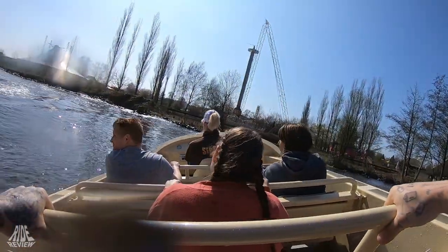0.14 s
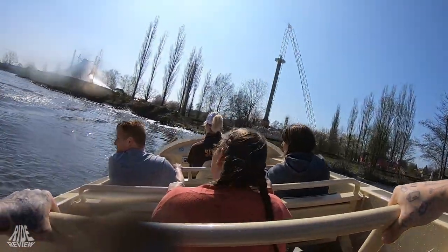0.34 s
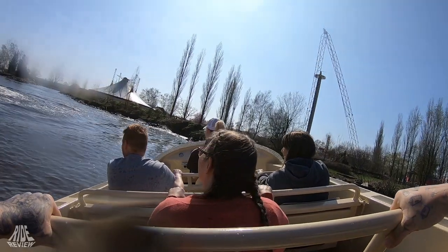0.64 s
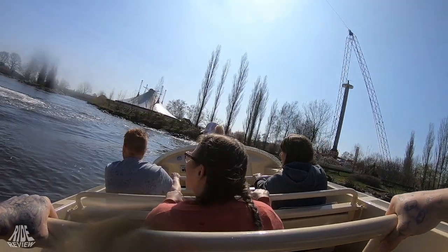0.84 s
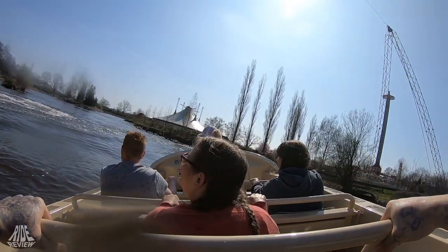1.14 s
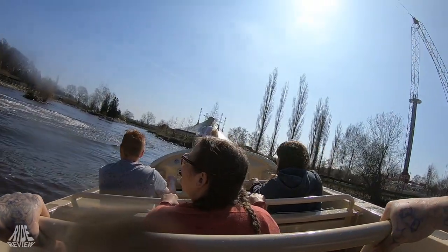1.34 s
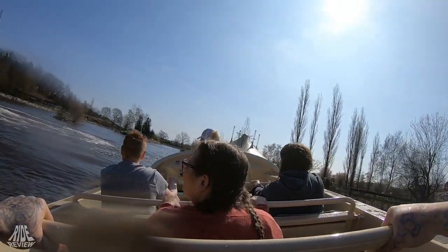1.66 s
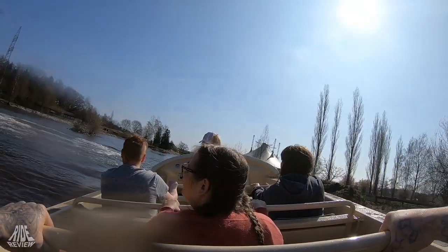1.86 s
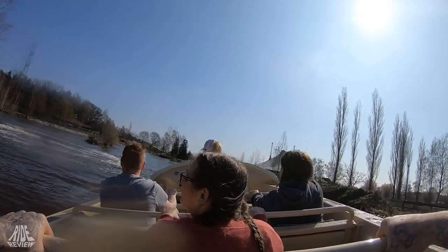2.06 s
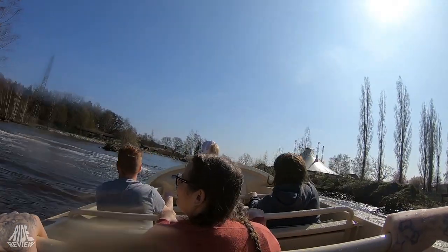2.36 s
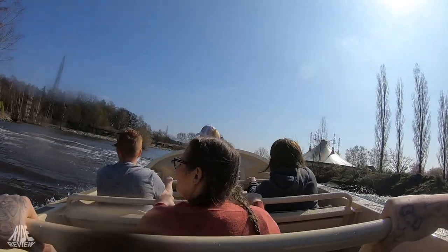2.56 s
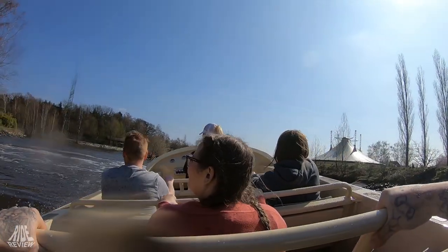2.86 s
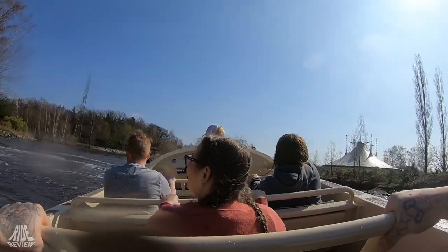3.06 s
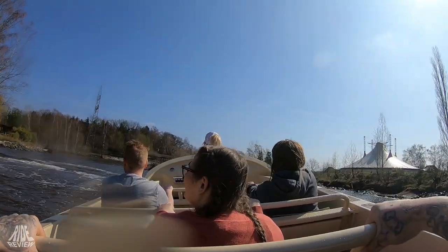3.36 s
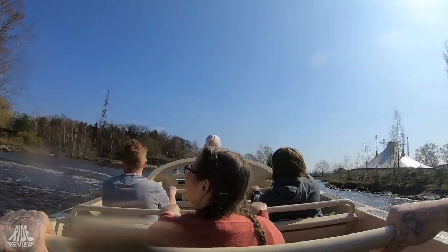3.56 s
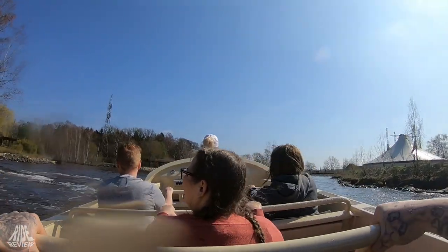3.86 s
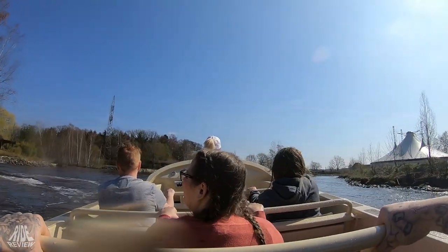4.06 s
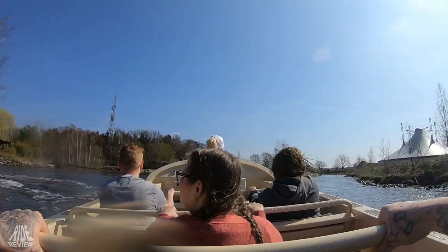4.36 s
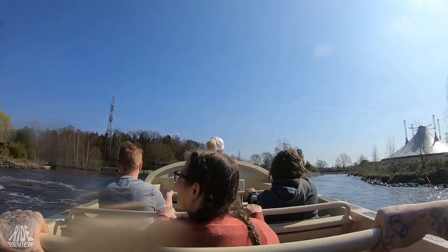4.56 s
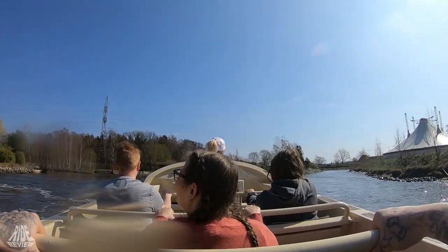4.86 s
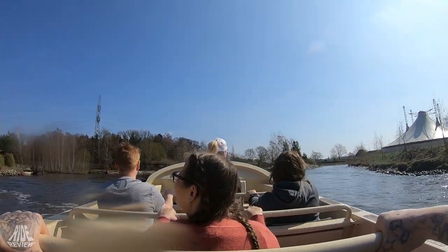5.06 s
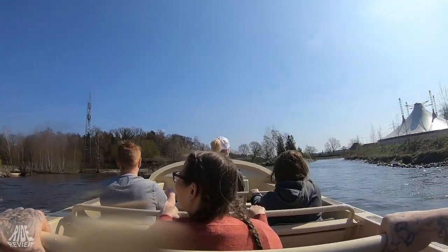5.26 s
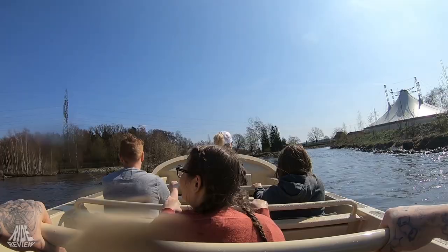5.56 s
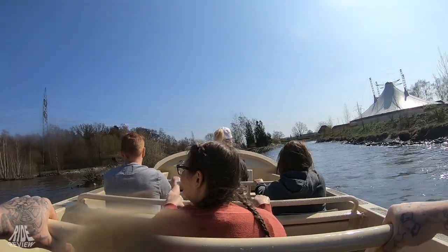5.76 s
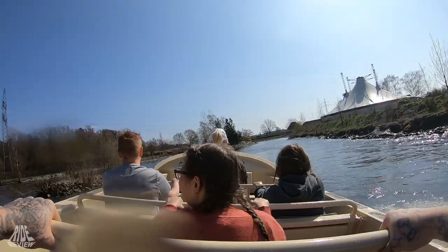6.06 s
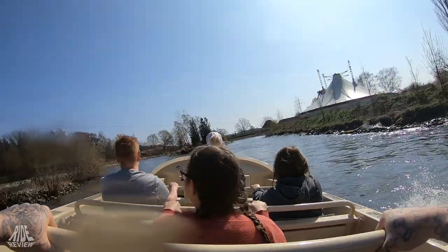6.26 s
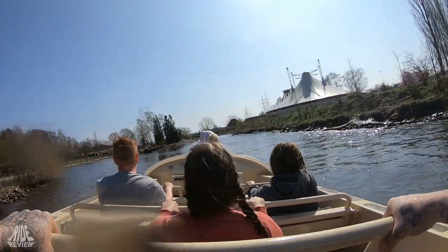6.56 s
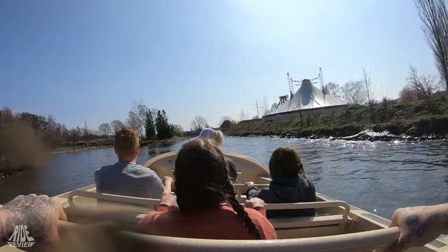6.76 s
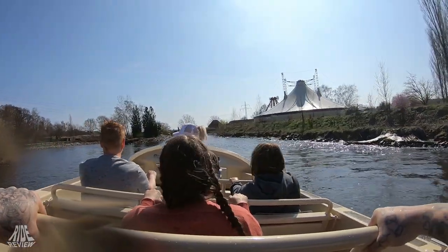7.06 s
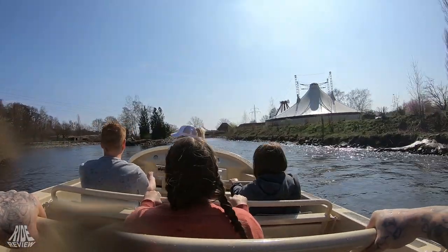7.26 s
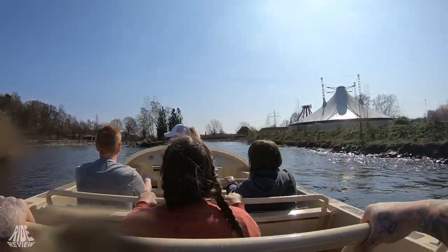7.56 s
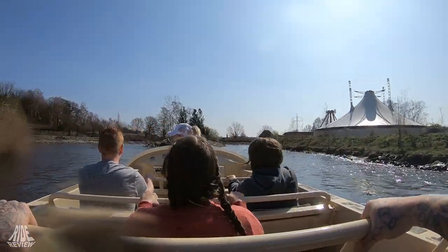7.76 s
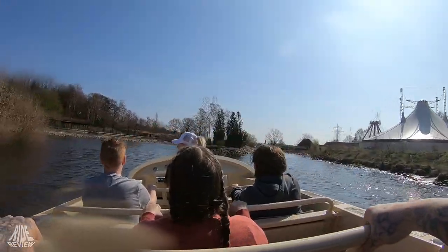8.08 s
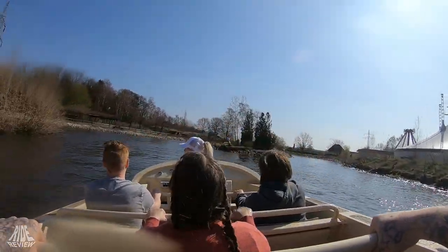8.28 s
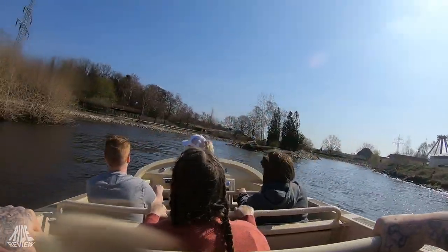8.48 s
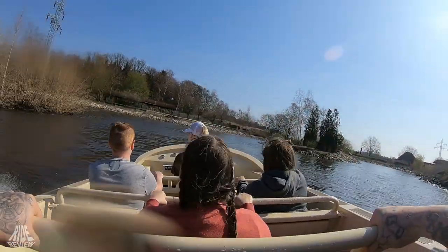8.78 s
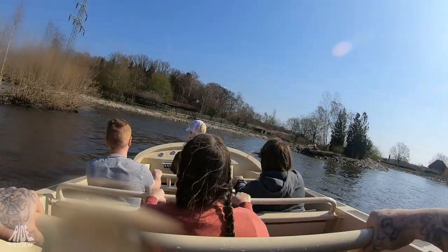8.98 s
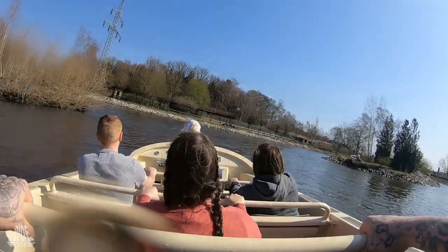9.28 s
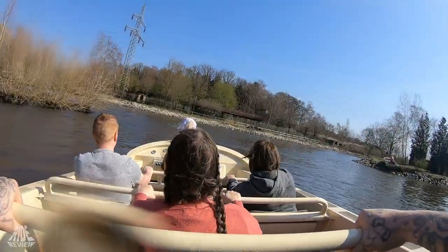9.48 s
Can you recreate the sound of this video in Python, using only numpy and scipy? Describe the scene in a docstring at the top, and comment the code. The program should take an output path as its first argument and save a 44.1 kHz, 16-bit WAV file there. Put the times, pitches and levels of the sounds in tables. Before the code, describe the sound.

On board a fast jet boat on an open river, a big engine drones loud and low at nearly constant pitch, its tones swelling and sinking. Wind rumbles on the exposed microphone, water rushes and spray hisses, and chop occasionally thumps the hull. After about eight seconds the throttle eases, pitch and loudness sag slightly, and tearing wind and rapid wave slaps take over.

```python
"""On a river, in the passenger seat of a V8 jet boat: it runs flat out, then eases off in a turn.
The exhaust drones as a sum of tones at multiples of the engine cycle, which swell and sink on their own,
and filtered noise burbles beside it. Shaped noise makes the rush of water, the hiss of spray and the wind,
which tears at the microphone near the end. Short bursts of noise make the slaps of chop and the ticks of drops."""
import sys
import numpy as np
from scipy import signal
from scipy.fft import rfft, irfft
from scipy.io import wavfile
from scipy.ndimage import uniform_filter1d, minimum_filter1d

SR = 44100
rng = np.random.default_rng(int(sys.argv[2]) if len(sys.argv) > 2 else 0)


def unload_audio(sound):
    """Save the sound as a 16-bit wav file, at the path given as the first command line argument."""
    columns = np.transpose(np.atleast_2d(sound))
    # keep every value between -1 and 1, then stretch to whole-number steps
    steps = np.round(np.clip(columns, -1, 1) * 32767)
    wavfile.write(sys.argv[1], SR, steps.astype(np.int16))


N = 424683  # length in samples


def undb(db):
    """Turn decibels into a gain."""
    return 10 ** (np.asarray(db) / 20)


def unit(x):
    """Scale a signal to an rms of 1."""
    return x / np.sqrt(np.mean(x ** 2))


def curves(table):
    """Join the points of each table column by straight lines in time."""
    times, *columns = np.transpose(table)
    return [np.interp(np.arange(N) / SR, times, column) for column in columns]


def walk(rate):
    """Smooth random wandering of rms 1 that changes about rate times a second."""
    points_per_s = SR // 20
    count = 16 * points_per_s
    f = np.fft.rfftfreq(count, 1 / points_per_s)
    slow = irfft(rfft(rng.standard_normal(count)) / (1 + (f / rate) ** 4))
    return np.interp(np.arange(N) / SR, np.arange(count) / points_per_s, unit(slow))


def noise(colour):
    """Noise of rms 1 whose spectrum follows a table of (frequency [Hz], level [dB])."""
    hz, db = np.transpose(colour)
    f = np.fft.rfftfreq(N, 1 / SR) + 1  # 1 Hz up, to avoid log of zero
    shape = undb(np.interp(np.log(f), np.log(hz), db))
    return unit(irfft(rfft(rng.standard_normal(N)) * shape, N))


def resonate(x, hz, width_hz):
    """A steep resonance: one band-pass applied twice."""
    b, a = signal.iirpeak(hz, hz / width_hz, fs=SR)
    return signal.lfilter(b, a, signal.lfilter(b, a, x))


def ramp(start_s, length_s):
    """A straight rise from 0 to 1."""
    return np.clip((np.arange(N) / SR - start_s) / length_s, 0, 1)


def swell(peak_s, rise_s, fall_s):
    """An exponential rise to 1, then an exponential fall."""
    t = np.arange(N) / SR
    return np.exp(np.minimum((t - peak_s) / rise_s, (peak_s - t) / fall_s))


def scattered_lag(wander):
    """Short waves take many paths around the hull, which shift as it moves (phase in radians)."""
    return rng.uniform(0, 2 * np.pi) + wander * walk(rate=1.2)


# Engine speed, before a slight unevenness: (time [s], four-stroke cycle rate [Hz])
ENGINE_SPEED = [(0, 30.0), (.5, 29.95), (.9, 30.06), (2.9, 29.94), (3.6, 30.03), (5.1, 30.06), (5.55, 30.2),
                (5.95, 30.14), (6.3, 30.31), (7.1, 30.2), (7.7, 30.11), (8.14, 29.9), (8.66, 29.15),
                (9.2, 28.85), (9.63, 28.75)]


def crank():
    """The crank turns a little unevenly: gives the cycle rate [Hz] and the cycles turned so far."""
    cycle_hz, = curves(ENGINE_SPEED)
    uneven_hz = cycle_hz * (1 + 0.0013 * walk(rate=14.6))
    return cycle_hz, rng.uniform() + np.cumsum(uneven_hz) / SR


# The outlets dip into the wash: (start [s], end [s], level change [dB])
OUTLET_DIPS = [(2.261, 2.45, -0.5), (6.168, 6.968, -2.5)]
DIP_RAMP_S = 0.085
# The throttle eases: the tones drop at once, then fall with each Hz of cycle rate lost
EASE_S, EASE_DROP_S = 8.158, 0.02
EASE_DROP_DB, EASE_DB_PER_HZ = -3.5, -2


def muffling(cycle_hz):
    """Exhaust level change in dB: it falls as the throttle eases and whenever the outlets dip under."""
    easing = ramp(EASE_S, EASE_DROP_S)
    lost_hz = cycle_hz[np.argmax(easing)] - cycle_hz
    dips = 0
    for start, end, db in OUTLET_DIPS:
        under = ramp(start - DIP_RAMP_S / 2, DIP_RAMP_S) - ramp(end - DIP_RAMP_S / 2, DIP_RAMP_S)
        dips = dips + db * under
    return easing * (EASE_DROP_DB + EASE_DB_PER_HZ * lost_hz) + dips


# All exhaust tones; the level counts only for the weak ones, relative to each other:
# (order: multiple of the cycle rate, relative level [dB])
EXHAUST_ORDERS = [(1, -34.1), (2, -2.0), (3, -12.3), (4, -8.4), (5, -12.8), (6, -1.3), (7, -13.3), (8, 0.0),
                  (9, -2.4), (10, -14.3), (11, -18.6), (12, -19.5), (13, -21.3), (14, -14.3), (15, -13.7),
                  (16, -12.6), (17, -19.6), (18, -28.5), (19, -41.6), (20, -30.5), (21, -23), (22, -29.8),
                  (23, -22.5), (24, -26.1)]
# Hull and pipe resonances that delay the orders near them: (frequency [Hz], width [Hz])
DELAY_RESONANCES = [(210, 20), (238, 40)]
LAG_DRIFT = 0.25  # the delays drift as the hull moves [radians]
# Lean of the hull, out of one turn, through an opposite one and into a third: (time [s], heel [degrees])
HULL_HEEL = [(0, 19.5), (1.6, 15), (3.9, 13), (5.7, -7), (6.6, -17), (7.5, 1.5), (8.6, 8), (9.63, 13)]
# Orders whose level follows the heel of the hull:
# (order, level on an even keel [dB], change [dB per degree of heel])
HEEL_ORDERS = [(4, -31.5, 0.4262), (5, -29.5, -0.34), (16, -37, 0.4383)]
# Strong orders at full throttle, each (time [s], level [dB]):
# the crankshaft boom (2), the firing tone (8), and the tones that swell and sink beside it (6, 9, 10)
ORDER_2 = [(0, -20), (1.2, -21), (2.1, -19), (2.4, -19.5), (3.4, -17.5), (3.7, -19), (5.2, -20.5),
           (5.6, -18), (6.399, -21), (7.6, -20), (8.051, -20.5), (8.3, -15), (8.6, -22), (9, -25),
           (9.63, -25)]
ORDER_6 = [(0, -19.5), (.45, -15), (.75, -24.5), (1.05, -14), (1.2, -22), (1.4, -15.5), (1.95, -18.5),
           (2.2, -25.5), (2.45, -19), (3.1, -16), (3.45, -21), (3.7, -15), (4.15, -17.5), (4.749, -21),
           (5.05, -21), (5.599, -24.5), (6.95, -27), (7.5, -19), (8.1, -25.5), (9.63, -18)]
ORDER_8 = [(0, -22), (.5, -28.5), (1, -21), (1.15, -15.5), (1.6, -15), (1.95, -19.5), (2.15, -17),
           (2.5, -26.5), (2.9, -17.5), (3.3, -17.5), (3.43, -23.5), (3.65, -15.5), (4, -19.5), (4.2, -17),
           (4.45, -18.5), (4.7, -14.5), (5.35, -14.5), (5.75, -17), (6.1, -17.5), (6.87, -17), (7.05, -15),
           (7.4, -15.5), (7.75, -14.5), (8.13, -20), (8.22, -23), (8.38, -16.5), (8.73, -17), (8.87, -14),
           (9.1, -20.5), (9.63, -22.5)]
ORDER_9 = [(0, -17), (.7, -18), (1, -20), (2.7, -18.5), (3.7, -23.5), (5.2, -20.5), (5.6, -24.5),
           (6.8, -22.5), (7.03, -19), (7.201, -22), (7.7, -20), (8.15, -18), (8.55, -24.5), (9.63, -25.5)]
ORDER_10 = [(0, -36), (2, -32.5), (3.9, -34.5), (4.202, -25.5), (5.5, -32), (5.9, -33), (6.6, -26.5),
            (6.95, -26), (7.35, -22.5), (8.15, -26), (9.63, -21.5)]
# All weak orders together, dimmer as the hull leans the other way:
# (time [s], level [dB], tilt before muffling [dB per octave])
WEAK_ORDERS = [(0, -22, 0.16), (1.5, -25, 0.57), (2.7, -24.5, 0.46), (4.4, -24, 0), (5.8, -29, 1.6),
               (6.7, -28, 0.5), (7.5, -28, 0.14), (9.63, -27.5, 0)]
# How far muffling lowers the weak orders, and the tilt it adds [dB per octave per dB]
BARK_SHARE, BARK_TILT_PER_MUFFLE = 1, 0.054


def exhaust(turn, muffle_db, fade_db=2.5, shake=0.086):
    """The firing pattern repeats once a cycle; resonances delay its orders and heel shifts their balance."""
    heel, = curves(HULL_HEEL)
    strong_db = {round(order): db + slope * heel for order, db, slope in HEEL_ORDERS}
    for order, table in (2, ORDER_2), (6, ORDER_6), (8, ORDER_8), (9, ORDER_9), (10, ORDER_10):
        strong_db[order], = curves(table)
    open_db, open_tilt_db = curves(WEAK_ORDERS)
    bark_db = open_db + BARK_SHARE * muffle_db
    tilt_db = open_tilt_db + BARK_TILT_PER_MUFFLE * muffle_db
    mean_cycle_hz = np.mean(np.array(ENGINE_SPEED)[:, 1])
    drone, bark = 0, 0
    for order, db in EXHAUST_ORDERS:
        if order > 12:
            lag = scattered_lag(wander=1.0)
        else:
            hz = order * mean_cycle_hz
            lag = sum(2 * np.arctan(2 * (hz - centre) / width) for centre, width in DELAY_RESONANCES)
            lag = lag + LAG_DRIFT * walk(rate=1.6)
        tone = np.sqrt(2) * np.cos(2 * np.pi * order * turn - lag)  # rms 1
        if order in strong_db:
            drone = drone + tone * undb(strong_db[order]) * (1 + shake * walk(rate=5.3))
        else:
            # water over the outlets dulls the bark, and each weak order fades on its own
            tone_db = db + tilt_db * np.log2(order) + fade_db * walk(rate=1.5)
            bark = bark + tone * undb(tone_db)
    return drone * undb(muffle_db) + unit(bark) * undb(bark_db)


# High engine tones: (order: multiple of the cycle rate, level relative to RASP_DB [dB])
ENGINE_RASP = [(25, -6.5), (26, -4), (27, -3), (28, -8.5), (29, -4.5), (30, 0.5), (31, -5.5), (32, -5.5),
               (33, -8.5), (34, -9), (35, -5.5), (36, -6.5), (38, -8.5), (39, -6), (40, -9), (41, -4.5),
               (42, -8.5), (44, -11.5), (45, -11.5), (46, -12)]
RASP_DB = -53.5


def rasp(turn, fade_db=1.5, wander=0.8):
    """The high orders come straight from the engine bay, so the wash does not muffle them."""
    total = 0
    for order, db in ENGINE_RASP:
        level = undb(RASP_DB + db + fade_db * walk(rate=2.2))
        tone = np.sqrt(2) * np.cos(2 * np.pi * order * turn - scattered_lag(wander))
        total = total + level * tone
    return total


# The burble grows louder once the boat swings into the opposite turn
BURBLE_DB, BURBLE_RISE_DB, BURBLE_FROM_S, BURBLE_RAMP_S = -32.5, 7.5, 5.65, 0.44
BURBLE_SHARE = 0.25  # part of the muffling that it follows
BURBLE_THROB = 0.3  # depth of the puffs


def burble(turn, muffle_db):
    """Gas breaks through the wash in puffs, once a cycle, and rings the pipe."""
    db = BURBLE_DB + BURBLE_RISE_DB * ramp(BURBLE_FROM_S, BURBLE_RAMP_S) + BURBLE_SHARE * muffle_db
    puffs = rng.standard_normal(N) * (1 + BURBLE_THROB * np.cos(2 * np.pi * turn))
    return undb(db) * unit(resonate(puffs, hz=272, width_hz=90))


# Water along the hull: (time [s], rush level before body_db is added [dB], spray level [dB])
WATER_LEVELS = [(0, -42.5, -62.5), (1.4, -44.5, -62), (4.9, -45, -62), (5.9, -43.5, -60.5),
                (7.05, -42, -58.5), (7.7, -46, -60.5), (8.1, -42.5, -59), (8.8, -43.5, -62),
                (9.63, -38, -67.5)]
# Spectra of rush and spray: (frequency [Hz], relative level [dB])
RUSH_SPECTRUM = [(150, 0.5), (340, -1.5), (525, -0.5), (585, -6), (675, -5), (765, -15), (870, -15.5),
                 (1050, -18.5), (1260, -19), (1500, -24.5), (2000, -27), (2500, -34.5), (3300, -46),
                 (6000, -84)]
SPRAY_SPECTRUM = [(1500, -14), (2900, -1), (3400, -3), (3900, 0), (5000, -1), (6600, -1), (7200, -10),
                  (8200, -13), (10000, -31), (12000, -52), (15000, -58)]
# A thin high sizzle builds in the first turn, sinks away as the hull rolls over and briefly returns:
# (time [s], level [dB])
SIZZLE_LEVEL = [(0, -88), (2.5, -85), (5, -80), (5.6, -76), (5.85, -71), (6.33, -76), (6.52, -105),
                (7.35, -105), (7.97, -81), (8.6, -105)]
SIZZLE_HZ, SIZZLE_WIDTH_HZ = 13200, 4200


def water(turn, throb=0.069, body_db=15.5, surge_db=1.1, drop_db=1.0):
    """The wash churns and throbs three times per engine cycle; spray and sizzle flicker above it."""
    rush_db, spray_db = curves(WATER_LEVELS)
    beat = np.cos(2 * np.pi * 3 * turn)
    surging = undb(body_db + rush_db + surge_db * walk(rate=30))
    rush = noise(RUSH_SPECTRUM) * (1 + throb * beat) * surging
    spray = noise(SPRAY_SPECTRUM) * undb(spray_db + drop_db * walk(rate=200))
    sizzle_db, = curves(SIZZLE_LEVEL)
    hiss = unit(resonate(rng.standard_normal(N), hz=SIZZLE_HZ, width_hz=SIZZLE_WIDTH_HZ))
    sizzle = undb(sizzle_db + 2.1 * walk(rate=45)) * hiss
    return rush + spray + sizzle


# Spectra of steady wind and gust: (frequency [Hz], relative level [dB])
WIND_SPECTRUM = [(15, -20.5), (30, -6.5), (45, -2), (75, 4.5), (105, 2), (135, 4.5), (171, 2.5),
                 (221, -0.5), (301, -8.5), (451, -24.5), (801, -75)]
GUST_SPECTRUM = [(80, -4), (300, -1), (640, -1.5), (1000, -11.5), (2000, -23), (3200, -34), (4200, -33),
                 (5500, -37), (7500, -58), (10000, -75)]
WIND_DB = -22.5
# Brief swells of the wind: (peak time [s], rise [dB], half length [s])
SWELLS = [(0.799, 4.9, 0.3), (2.3, 1.7, 0.44), (6.15, 3.3, .5)]
# A cross wind builds in the last turn, then tears at the microphone
CROSSWIND_S, CROSSWIND_DB_PER_S = 6.77, 2
GUST_S, GUST_ATTACK_S, GUST_DB, GUST_DB_PER_S = 8.72, 0.41, -34.5, 5
# Gust bursts: typical rate, jump relative to the steady gust, decay as a share of the gap, attack
BURSTS_PER_S, BURST_RISE, BURST_SHARE, BURST_ATTACK_S = 24, 1.5, 0.25, 0.004


def wind():
    """Eddies rumble on the microphone; the cross gust tears at it in short bursts over a steady roar."""
    eddy_db, burst_db = 1.3, 1.5
    t = np.arange(N) / SR
    swells_db = sum(db * np.exp(-((t - s) / half) ** 2) for s, db, half in SWELLS)
    wind_db = WIND_DB + swells_db + CROSSWIND_DB_PER_S * np.maximum(t - CROSSWIND_S, 0)
    rumble = noise(WIND_SPECTRUM) * undb(wind_db + eddy_db * walk(rate=4.4))
    gust = ramp(GUST_S, GUST_ATTACK_S) * undb(GUST_DB + GUST_DB_PER_S * (t - GUST_S))
    # position within the uneven gap between bursts, from 0 to 1
    since_burst = np.cumsum(BURSTS_PER_S * np.exp(0.5 * walk(rate=30))) / SR % 1
    jumps = 1 + BURST_RISE * np.exp(-since_burst / BURST_SHARE)
    bursts = unit(uniform_filter1d(jumps, int(BURST_ATTACK_S * SR)))
    return rumble + noise(GUST_SPECTRUM) * gust * bursts * undb(burst_db * walk(rate=40))


# Chop slaps the hull: (time [s], splash level [dB], splash decay [s], thump level [dB])
CHOP_SLAPS = [(.92, -33.5, .04, -25), (3.135, -39, .025, -20), (6.278, -32, .009, -30),
              (6.337, -43, .015, -22), (6.41, -34.5, .015, -29), (6.61, -34, .01, -34),
              (6.888, -28.5, .018, -24), (7.831, -35, .02, -21), (7.847, -31, .045, -30),
              (7.965, -43, .02, -23), (9.228, -32, .008, -28), (9.278, -31, .014, -23),
              (9.338, -28, .008, -28), (9.433, -26.5, .015, -26), (9.468, -27, .01, -25),
              (9.526, -26, .018, -24), (9.59, -27, .012, -25)]
# Spectrum of a splash: (frequency [Hz], relative level [dB])
SPLASH_SPECTRUM = [(200, -3), (500, 0), (800, -3), (1300, -8), (1900, -17), (2600, -35), (6000, -65)]
# Ring of the hull under a slap
THUMP_HZ, THUMP_WIDTH_HZ, THUMP_DECAY_S = 360, 160, 0.021


def slaps(rise_s=0.0035):
    """Each wave meets the hull with a dull thump and a short splash."""
    splashes = sum(undb(db) * swell(s, rise_s, decay) for s, db, decay, _ in CHOP_SLAPS)
    blows = sum(undb(db) * swell(s, rise_s, THUMP_DECAY_S) for s, _, _, db in CHOP_SLAPS)
    ring = unit(resonate(rng.standard_normal(N), hz=THUMP_HZ, width_hz=THUMP_WIDTH_HZ))
    return noise(SPLASH_SPECTRUM) * splashes + blows * ring


# Single drops: (time [s], level [dB])
DROP_TICKS = [(1.067, -54), (7.99, -51), (9.227, -48), (9.467, -49)]
DROP_HZ, DROP_WIDTH_HZ, DROP_DECAY_S = 4800, 1600, 0.005


def drops(rise_s=0.0005):
    """Single drops burst with a small bright tick."""
    ticks = sum(undb(db) * swell(s, rise_s, DROP_DECAY_S) for s, db in DROP_TICKS)
    return ticks * unit(resonate(rng.standard_normal(N), hz=DROP_HZ, width_hz=DROP_WIDTH_HZ))


def scene():
    """The turning crank drives exhaust, rasp, burble and wash; wind, slaps and drops are added."""
    cycle_hz, turn = crank()
    muffle_db = muffling(cycle_hz)
    engine = exhaust(turn, muffle_db) + rasp(turn) + burble(turn, muffle_db)
    return (engine + water(turn) + wind() + slaps() + drops())[None]


TOP_HZ = 15700  # upper edge of the sound


def record(dry):
    """A look-ahead limiter holds the peaks down, and a steep low-pass cuts the top."""
    size, ceiling_db = SR // 50, -2.3
    headroom = np.minimum(1, undb(ceiling_db) / (np.abs(dry) + 1e-9))
    gain = uniform_filter1d(minimum_filter1d(headroom, 2 * size), size)
    low_pass = signal.ellip(8, 0.2, 80, TOP_HZ, fs=SR, output="sos")
    return signal.sosfilt(low_pass, dry * gain)


dry = scene()
out = record(dry)
unload_audio(out)
```